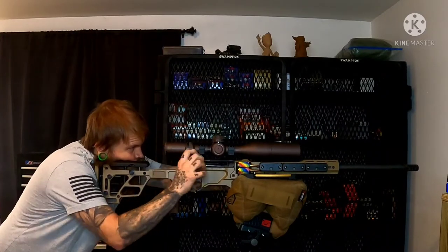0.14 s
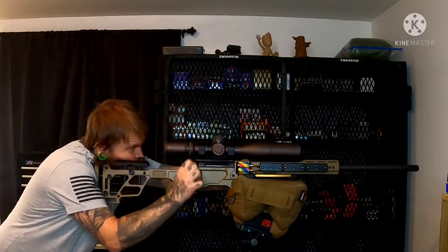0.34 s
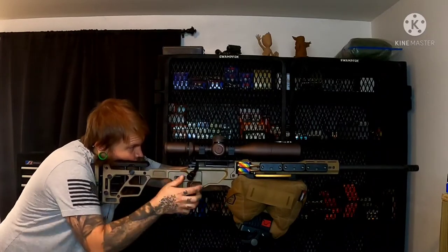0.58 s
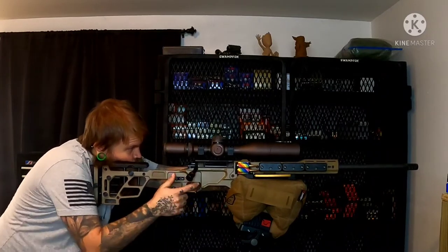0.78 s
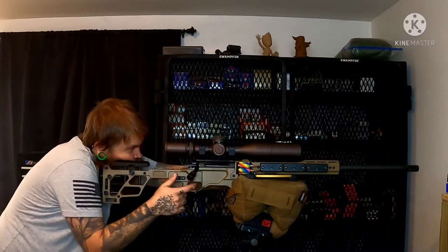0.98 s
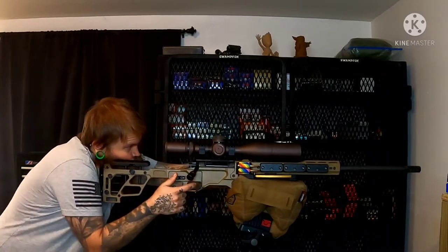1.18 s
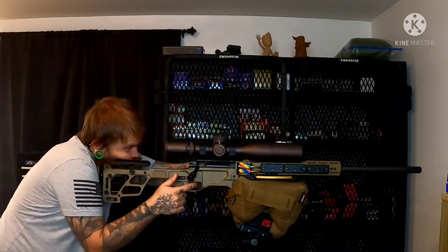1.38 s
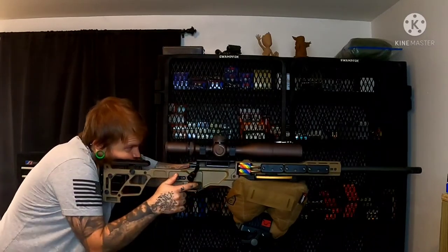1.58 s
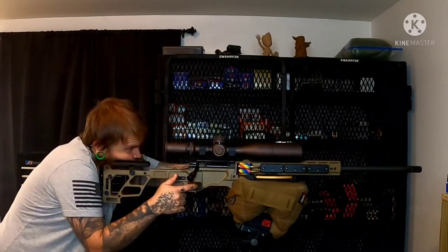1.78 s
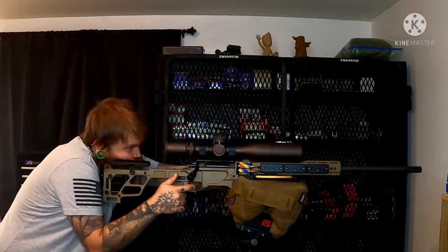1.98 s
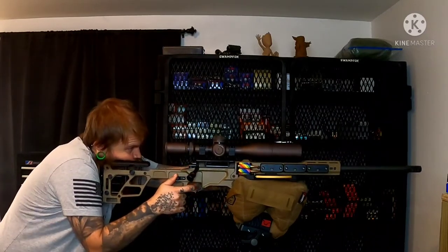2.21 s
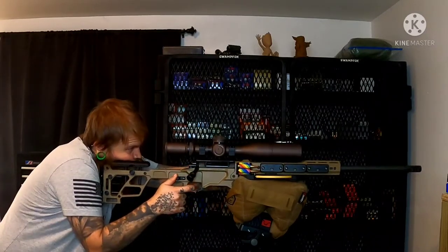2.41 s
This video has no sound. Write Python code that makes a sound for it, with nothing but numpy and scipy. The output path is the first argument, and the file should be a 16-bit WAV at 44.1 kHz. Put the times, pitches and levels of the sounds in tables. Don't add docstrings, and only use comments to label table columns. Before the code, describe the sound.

A rifle bolt is worked close by: light clicks, a scraping pull back with hard clacks, then a solid locking clack. A soft hand and sleeve rub follows in a small furnished room, picked up by a phone.

```python
import sys
import numpy as np
from scipy import signal
from scipy.fft import rfft, irfft
from scipy.io import wavfile
from scipy.ndimage import uniform_filter1d

SR = 44100
rng = np.random.default_rng(int(sys.argv[2]) if len(sys.argv) > 2 else 0)


def int16_out(signal):
    q = np.round(np.clip(np.atleast_2d(signal).T, -1, 1) * 32767)
    wavfile.write(sys.argv[1], SR, q.astype(np.int16))


def invert_db(x):
    u = np.asarray(x, float) / 20
    return 10 ** u


N = 108045
T = np.arange(N) / SR
RING_N = 8192


def curve(x, table, col=1):
    table = np.array(table, float)
    return np.interp(x, table[:, 0], table[:, col])


def colour(x, points):
    p = np.array(points, float)
    hz = np.maximum(np.arange(1025) * SR / 2048, 10)
    log_gain = np.interp(np.log(hz), np.log(p[:, 0]), p[:, 1]) * np.log(10) / 20
    cepstrum = irfft(log_gain)
    cepstrum[1:1024] *= 2
    cepstrum[1025:] = 0
    return signal.fftconvolve(x, irfft(np.exp(rfft(cepstrum))))[:len(x)]


def unit(x):
    return x / np.sqrt(np.mean(x ** 2))


def walk(rate_hz):
    k = max(int(SR / rate_hz), 1)
    steps = np.repeat(rng.standard_normal(N // k + 1), k)[:N]
    return unit(uniform_filter1d(steps, k))


def wander(hz, width_hz, level_db):
    peak = signal.iirpeak(hz, hz / width_hz / 1.8, SR)
    return invert_db(level_db) * unit(signal.filtfilt(*peak, rng.standard_normal(N)))


def even(x, size):
    s = rfft(x)
    return irfft(s / uniform_filter1d(np.abs(s), size=size))


def ring(modes, gain_db, detune, rise_s):
    m, t = np.array(modes, float), T[:RING_N, None]
    tones = invert_db(m[:, 1] + gain_db) * np.sin(2 * np.pi * m[:, 0] * detune * t)
    decays = 1000. ** (-t / m[:, 2])
    return (tones * decays).sum(axis=1) * (1 - np.exp(-t[:, 0] / rise_s))


# pitch_hz, t60_s, level_db
ROOM_BANDS = [(149, 0.18, 0.5), (400, 0.2, 3), (650, 0.47, 4), (1050, 0.47, -1), (1500, .3, -1.5),
              (2000, 0.35, 0), (4500, 0.28, -3.5), (8000, 0.27, 0), (13000, 0.18, 7)]


def room(x):
    length, first_wall_s, build_s, early_s, curtain_s = 24000, 0.00091, 0.0048, 0.05, 0.53
    bands, t = np.array(ROOM_BANDS), T[:length]
    log_hz = np.log(np.maximum(np.fft.rfftfreq(length, 1 / SR), 1))
    uneven_db = 10.0 * np.exp(-t / 0.031) * rng.standard_normal(length)
    scatter = rng.standard_normal(length) * invert_db(uneven_db)
    onset = 1 - np.exp(-np.maximum(t - first_wall_s, 0) / build_s)
    early = np.exp(-t / early_s) + 0.022
    spectrum = rfft(even(scatter * onset * early, size=41) / early)
    tail = np.zeros(length)
    for (_, t60_s, level_db), share in zip(bands, np.eye(len(bands))):
        band = irfft(spectrum * np.interp(log_hz, np.log(bands[:, 0]), share))
        tail += invert_db(level_db) * band * 1000. ** (-t / t60_s)
    tail *= np.sqrt(onset) * np.exp(-(t / curtain_s) ** 2)
    return signal.fftconvolve(x, tail / np.sqrt(np.sum(tail ** 2)))[:N]


# time_s, level_db
SWELL = [(0, -0.5), (.85, -2.5), (1.2, -4), (1.6, 0.5), (2.0, -2.5)]


def rumble(width_hz, level_db):
    return wander(62.4, width_hz, level_db)


# pitch_hz, level_db
AIR = [(30, -46.5), (100, -18.5), (170, -7), (350, -13), (1200, -6.5), (2500, -14), (6000, -32),
       (14000, -40.5)]


def air():
    air_db, flicker_db, hum_waver_db = -60.5, 0.7, 1
    hum = wander(178, 34, -69) * invert_db(hum_waver_db * walk(42))
    breath = unit(colour(rng.standard_normal(N), AIR)) * invert_db(air_db + flicker_db * walk(12))
    return (breath + hum) * invert_db(curve(T, SWELL))


# centre_s, length_s, level_db, pitch_hz
CREAKS = [
    (1.571, 0.039, -51, 178),
    (1.64, 0.01, -53.5, 227),
    (1.682, .03, -61.5, 168.5),
    (1.794, 0.055, -62.5, 195),
    (1.88, 0.065, -66, 178),
    (1.568, .04, -63, 304),
    (1.683, 0.073, -70, 376),
]


def creaks():
    wobble_s = np.cumsum(0.012 * walk(58.6)) / SR
    out = np.zeros(N)
    for centre_s, length_s, level_db, pitch_hz in CREAKS:
        swell = np.exp(-((T - centre_s) / length_s * 2) ** 2)
        out += invert_db(level_db) * swell * np.sin(2 * np.pi * pitch_hz * (T + wobble_s))
    return out


# time_s, level_db, brightness_db (twice this raises the band above 2.5 kHz and lowers
RUB = [(.04, -84, -8), (.075, -60, -4.5), (.1, -49.5, 0), (.16, -67.5, -6), (.3, -72.5, 8.5),
       (.93, -81.5, 5), (.995, -51, 3), (1.055, -44.5, 1.5), (1.11, -56, -1.5), (1.16, -72.5, -5.5),
       (1.21, -60.5, -1.5), (1.26, -61.5, -3), (1.295, -50.5, 1.5), (1.36, -61, -3.5), (1.45, -68, 3),
       (1.5, -75.5, 2), (1.72, -68, 2), (1.98, -73.5, 2)]
# pitch_hz, level_db
CLOTH = [(180, -58), (300, -15.5), (867, -8), (1090, 1), (4540, -5), (7000, -12.5), (11000, -22),
         (14000, -33.5)]


def rub():
    grit_db, fade_db_per_s, pivot_hz = -1.5, 15.5, 2500
    weave_hz, weave_width_hz, weave_db = 4680, 240, -2
    grains = rng.standard_normal(N) * invert_db(grit_db * walk(1100) + 0.6 * walk(40))
    fibres = unit(colour(grains, CLOTH))
    weave = signal.lfilter(*signal.iirpeak(weave_hz, weave_hz / weave_width_hz, SR), fibres)
    fibres = fibres + invert_db(weave_db) * weave
    low = signal.lfilter(*signal.butter(1, pivot_hz, fs=SR), fibres)
    high = fibres - low
    tilt_db = 2 * curve(T, RUB, col=2)
    fade_db = -fade_db_per_s * np.maximum(T - RUB[-1][0], 0)
    return (low * invert_db(-tilt_db) + high * invert_db(tilt_db)) * invert_db(curve(T, RUB) + fade_db)


RISE_S, STOCK_RISE_S = 0.00036, 0.0014

# time_s, level_db
SLIDE = [
    (.05, -84.5),
    (.075, -52),
    (.095, -57.5),
    (.175, -66),
    (.2, -49.5),
    (.23, -39),
    (.26, -36.5),
    (.33, -30.5),
    (.43, -71.5),
]
# pitch_hz, level_db, t60_s
STEEL = [(1350, 3.5, 0.01), (1700, 2.5, 0.009), (2028, 2, 0.02), (2300, 1.5, 0.029), (2750, 0.5, 0.02),
         (3060, 6.5, 0.026), (3600, 6, 0.025), (4120, 3.5, .03), (4618, 1, 0.03), (4783, 9.5, 0.022),
         (5600, 6.5, 0.015), (6200, 8, .015), (6930, 3, 0.018), (9250, -9.5, 0.03)]
# pitch_hz, level_db, t60_s
STOCK = [(180, -11, 0.085), (285, -10, 0.092), (358, -12.5, .04), (465.5, 0, 0.051), (600, 0.5, 0.032),
         (677, 1.5, 0.045), (791, 1.5, .04), (1134, -3, 0.017)]
# pitch_hz, level_db
CRACK = [(120, -33), (300, -20), (800, -4), (1400, 2.5), (3500, 2), (7000, -3), (11200, -15), (14000, -24)]


def slide():
    ticks_per_s, grit_db = 3000, 2
    ticks = (rng.random(N) < ticks_per_s / SR) * rng.choice([-1, 1], N)
    ticks = ticks * invert_db(grit_db * rng.exponential(size=N))
    steel = ring(STEEL, 3, 0.95, RISE_S) * np.exp(-T[:RING_N] / 0.0006)
    stock = ring(STOCK[3:], 0, 0.98, STOCK_RISE_S)
    ringing = unit(signal.fftconvolve(ticks, steel + invert_db(-15.5) * stock)[:N])
    scrape = unit(colour(ticks, CRACK))
    moving = (T > SLIDE[0][0]) & (T < SLIDE[-1][0])
    return unit(invert_db(-3.0) * ringing + invert_db(-2.5) * scrape) * invert_db(curve(T, SLIDE)) * moving


def near_db(modes, hz, octaves):
    return -3 * (np.log2(np.array(modes)[:, 0] / hz) / octaves) ** 2


def contact_crack(bright_hz, softness_db):
    crack_s, focus_db, focus_db_per_db = 0.0036, 3.5, 0.5
    t = T[:RING_N]
    burst = rng.standard_normal(RING_N) * np.exp(-t / crack_s) * (1 - np.exp(-t / RISE_S))
    burst = even(burst, size=15) * np.exp(-t / crack_s / 4)
    skirt_db = -focus_db - focus_db_per_db * softness_db
    focus = [(bright_hz / 6, 2.5 * skirt_db), (bright_hz / 2, skirt_db), (bright_hz, 0),
             (bright_hz * 2, 0.55 * skirt_db), (bright_hz * 6, 2.95 * skirt_db)]
    crack = colour(colour(burst, CRACK), focus)
    return 2 * crack / np.abs(crack).max()


# start_s, level_db, bright_hz, thump_db, thump_hz
KNOCKS = [(0.0488, -44, 2140, -2, 760), (.066, -55.5, 1040, 8, 700), (.0868, -46.5, 4580, -5.5, 700),
          (.207, -16, 4690, -26.5, 460), (.2125, -20, 2300, -16, 460), (0.261, -8, 3060, -27, 450),
          (.2645, -15, 3730, -18, 330), (0.284, -26.5, 1490, -4.5, 460), (0.29, -25, 2830, -12.5, 306),
          (0.4338, -23.5, 4800, -23, 670), (0.4394, -24, 4570, -14.5, 700),
          (.4475, -13.5, 2830, -11.5, 690), (.4535, -19.5, 2830, -28, 600), (0.471, -29.5, 2500, -28, 670),
          (0.4949, -13.5, 1900, -9.5, 650), (0.4963, -20.5, 4900, -8.5, 270), (.518, -23.5, 1260, -7, 640),
          (0.237, -40.5, 930, 12, 450), (0.599, -50, 690, 14, 285), (.093, -61, 890, -5.5, 660),
          (0.0758, -51.5, 5440, -21, 700), (0.197, -52, 5230, -19.5, 693), (.209, -23, 2550, -19, 463),
          (0.2623, -19, 1820, -24.5, 460), (.181, -60, 8500, -19.5, 700), (0.2171, -25.5, 2100, -17, 460),
          (.2285, -31.5, 4830, -20.5, 460), (0.2698, -20.5, 3360, -20.5, 460),
          (.2755, -30.5, 9620, -26, 460), (0.2961, -26, 3000, -16, 460), (0.4323, -27.5, 4800, -32, 670),
          (0.4502, -25, 5000, -26.5, 690), (.458, -27, 3700, -16, 690), (.464, -28.5, 2580, -16, 690),
          (.479, -32, 3280, -16, 690), (.49, -28.5, 2500, -11, 690), (.5025, -25, 4230, -7, 640),
          (0.5063, -30.5, 1330, -9, 640), (.524, -26.5, 4970, -12, 640), (.537, -33.5, 1200, -2, 640)]
# pitch_hz, level_db, t60_s
STEEL_HOME = [(1208, -0.5, .02), (1370, 5.5, .015), (1722, 4.5, 0.015), (2100, -1.5, 0.03),
              (2502, 7.5, 0.04), (2690, 9, 0.026), (3000, 2.5, 0.02), (3313, 2, 0.03), (3700, 3.5, .025),
              (4114, 5.5, 0.033), (4390, 4, 0.03), (4920, 10, 0.034), (5660, -17, 0.018),
              (6960, -8.5, 0.034)]


def knocks():
    home_s, hard_knock_db = 0.4, -13
    steel_db, crack_db, scatter_db, detune = -13.5, -1.5, 2, 0.012
    steel_octaves, thump_octaves = 0.9, 0.4
    tip_db, tip_t60_s, tip_rise_s, tip_db_per_db = -0.5, 0.014, 0.00048, 0.505
    out = np.zeros((3, N + RING_N))
    for k, (start_s, level_db, bright_hz, thump_db, thump_hz) in enumerate(KNOCKS):
        modes = STEEL if start_s < home_s else STEEL_HOME
        steel_gain_db = near_db(modes, bright_hz, steel_octaves) + scatter_db * rng.standard_normal(len(modes))
        steel = ring(modes, steel_gain_db, 1 + detune * rng.standard_normal(len(modes)), RISE_S)
        crack = contact_crack(bright_hz, hard_knock_db - level_db)
        tip_gain_db = tip_db_per_db * (hard_knock_db - max(level_db, 2 * hard_knock_db))
        tip = ring([(bright_hz, tip_db, tip_t60_s)], tip_gain_db, 0.94, tip_rise_s)
        stock_gain_db = thump_db + near_db(STOCK, thump_hz, thump_octaves)
        stock_gain_db = stock_gain_db + scatter_db * rng.standard_normal(len(STOCK))
        stock = ring(STOCK, stock_gain_db, 1 + detune * rng.standard_normal(len(STOCK)), STOCK_RISE_S)
        knock = invert_db(steel_db) * steel + invert_db(crack_db) * crack + tip + stock
        i = int(start_s * SR)
        out[k % 3, i:i + RING_N] += invert_db(level_db) * knock
    return out[:, :N]


# pitch_hz, level_db
SIDE = [(30, -14), (100, -12), (200, -24), (1000, -28), (3000, -31), (6000, -23), (10000, -14), (13000, 0)]


def scene():
    low_cut = signal.butter(3, 150, "high", fs=SR, output="sos")
    spots = signal.sosfilt(low_cut, [*knocks(), slide()])
    rifle = spots.sum(axis=0)
    cloth = rub()
    room_db, rub_wet_db, rumble_db = 1.5, -7, -77
    wet = sum(room(spot) for spot in spots) + room(invert_db(rub_wet_db) * cloth)
    mid = rifle + cloth + invert_db(room_db) * wet + creaks() + air()
    mid = mid + rumble(25, rumble_db) * invert_db(2.8 * curve(T, SWELL))
    side_room_db, side_air_db, side_rumble_db = -1, -8, -9
    diffuse = invert_db(side_room_db) * room(rifle) + invert_db(side_air_db) * air()
    side = colour(diffuse, SIDE) + rumble(41, rumble_db + side_rumble_db)
    return np.array([mid + side, mid - side])


def band_limit(x):
    return signal.sosfilt(signal.butter(12, 14380, fs=SR, output="sos"), x)


# pitch_hz, level_db
MIC = [(3900, 2), (4650, 0.5), (5300, 0.5), (5900, 1), (7000, 0.5), (7500, -1.5), (11300, 0.5), (12200, -9)]


def record(dry):
    ceiling, top_hz, hiss_db, hiss_hz = 1.3, 13600, -81.5, 9000
    heard = np.array([colour(channel, MIC) for channel in dry])
    rounded = ceiling * np.tanh(heard / ceiling)
    top_cut = signal.ellip(8, 0.2, 60, top_hz, fs=SR, output="sos")
    hiss = signal.lfilter(*signal.butter(2, hiss_hz, "high", fs=SR), rng.standard_normal(dry.shape))
    return band_limit(signal.sosfilt(top_cut, rounded) + invert_db(hiss_db) * hiss)


dry = scene()
out = record(dry)
int16_out(out)
```